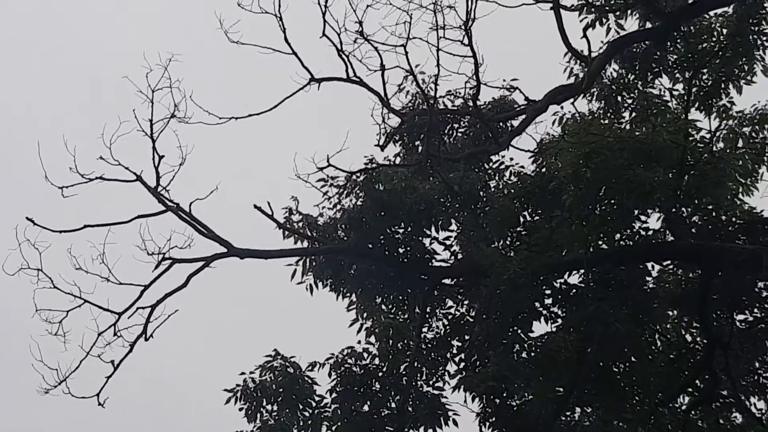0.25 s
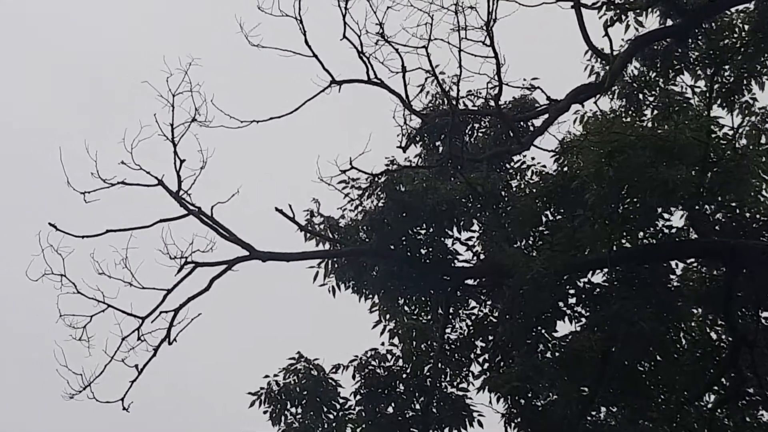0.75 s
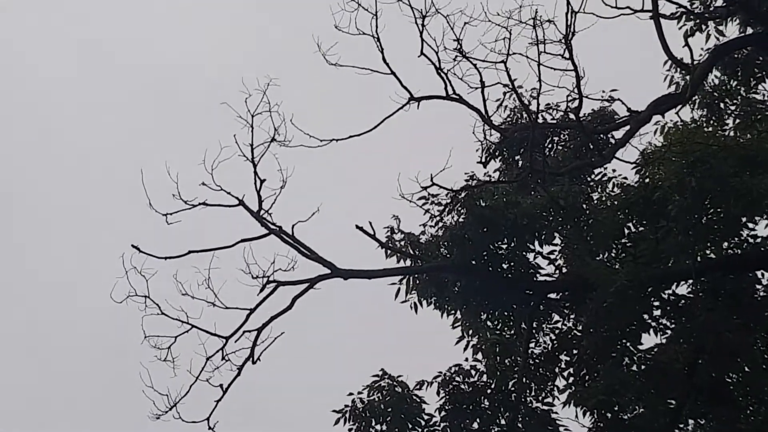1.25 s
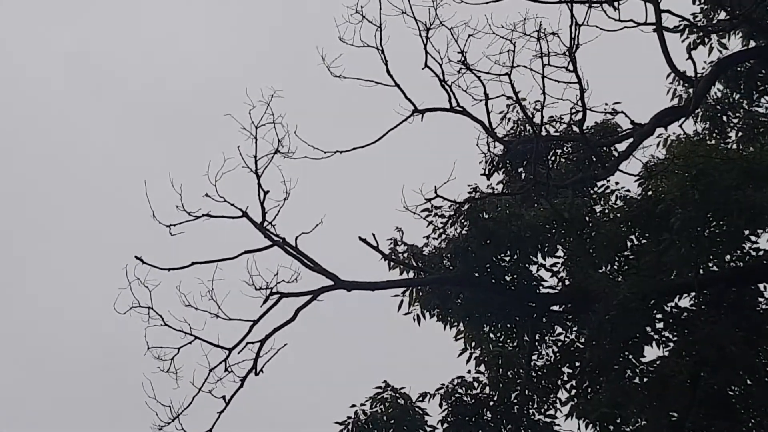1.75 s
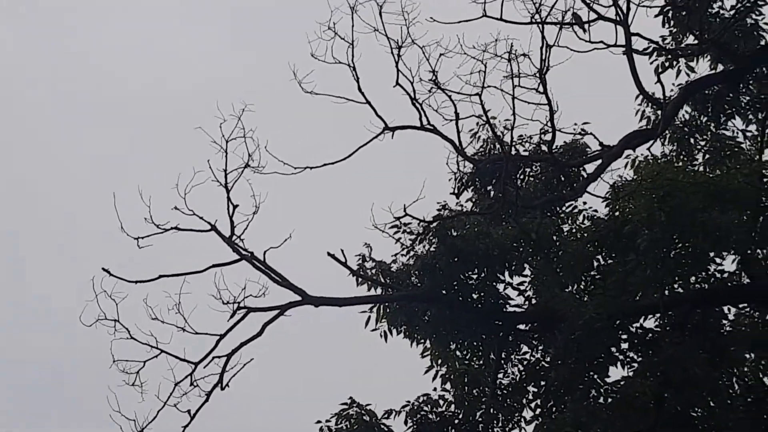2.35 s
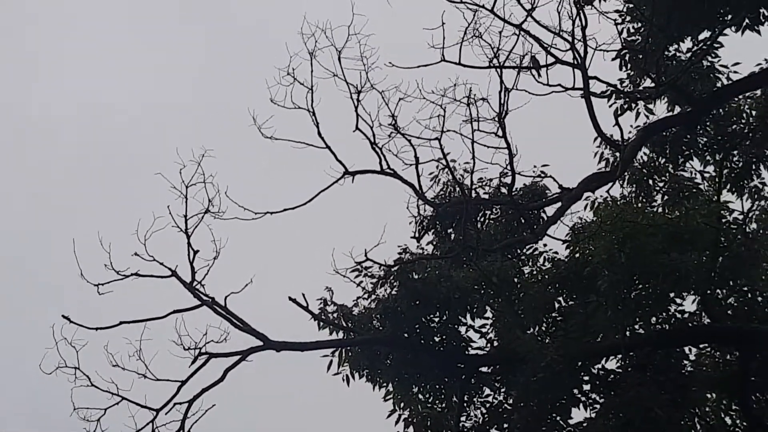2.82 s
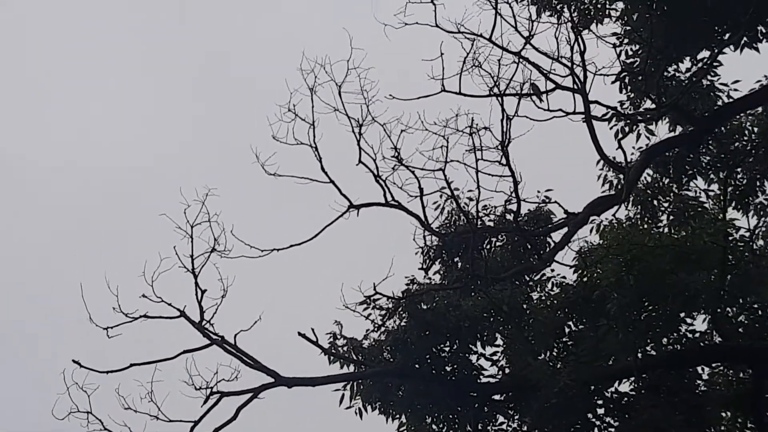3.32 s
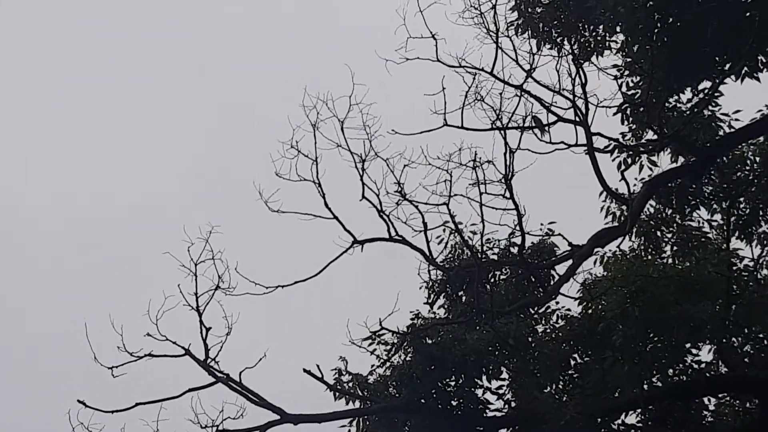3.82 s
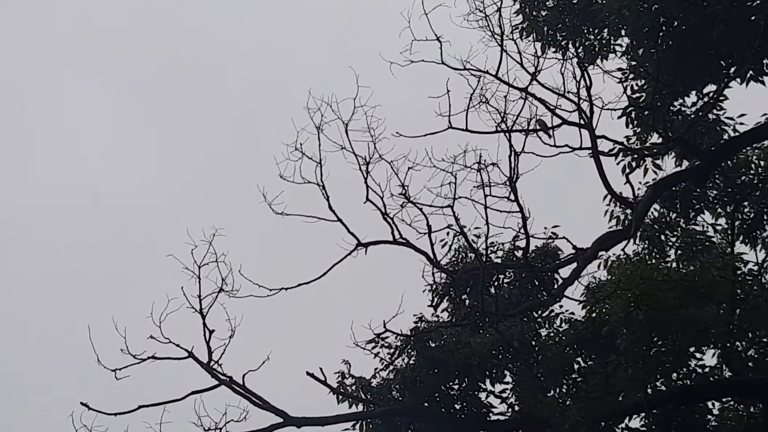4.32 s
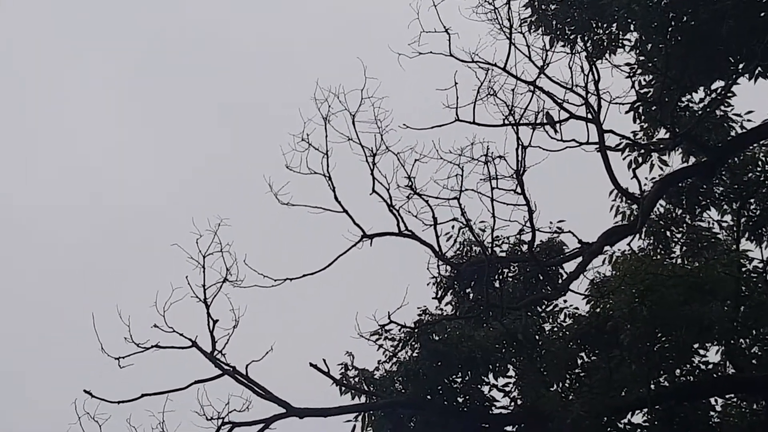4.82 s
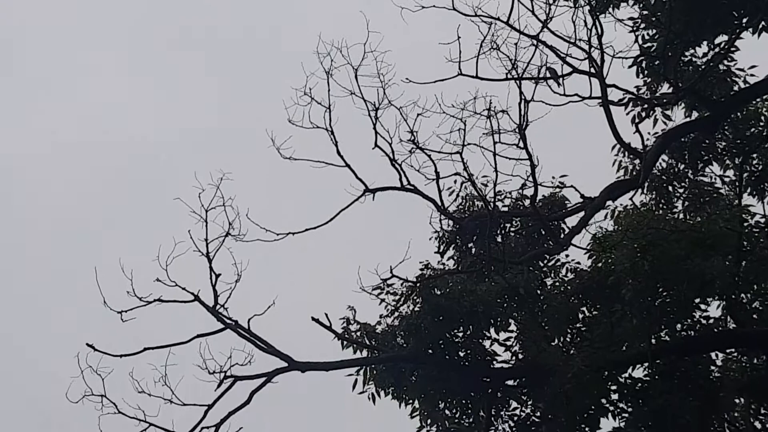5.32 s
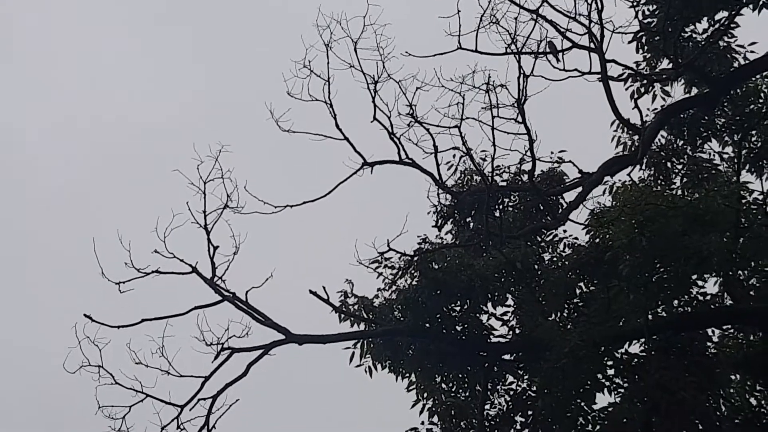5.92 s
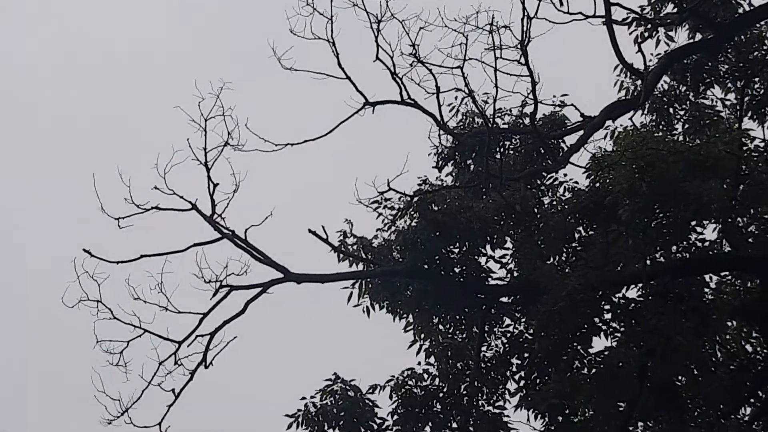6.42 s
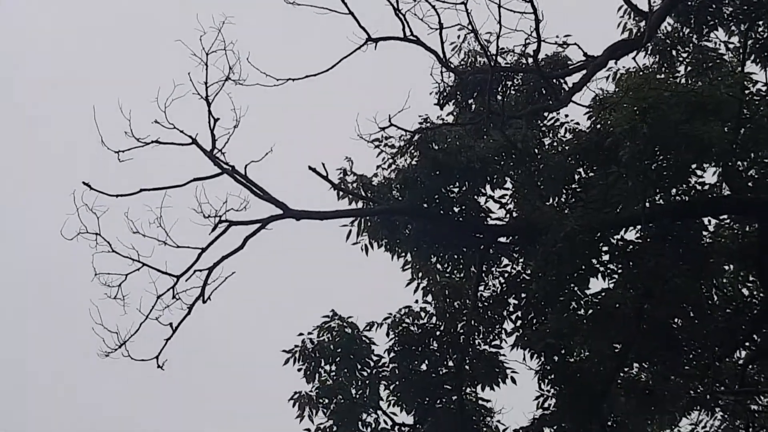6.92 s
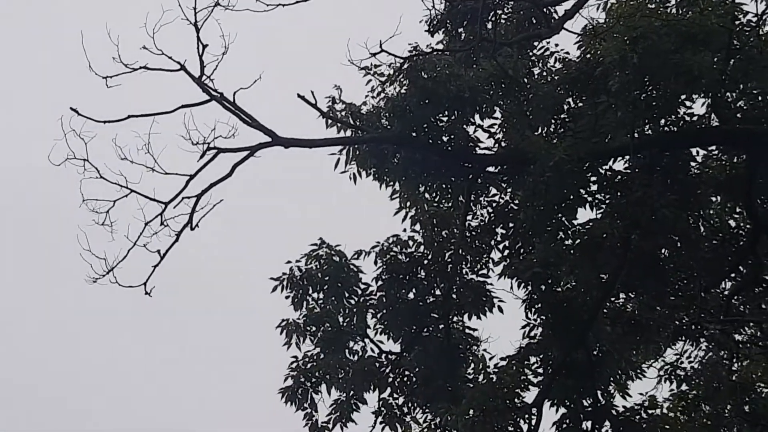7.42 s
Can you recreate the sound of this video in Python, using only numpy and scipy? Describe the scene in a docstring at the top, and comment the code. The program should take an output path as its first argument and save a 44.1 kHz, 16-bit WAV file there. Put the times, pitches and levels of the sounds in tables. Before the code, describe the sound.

Outdoors among trees, a bird close to the stereo microphones gives harsh falling squawks, quick rising yelps and short rasps throughout. Further off, frogs croak about once a second and moan softly, with low groans joining halfway. A small bird chirps and whistles to the left. A few dull bumps hit the left microphone near the start. Faint insects, a distant high chorus and low rumble lie behind.

```python
"""Under wet trees at dusk, on two spaced microphones. Close by, a bird squawks: harsh falling calls,
rising yelps and short rasps, its buzzing syrinx coloured by throat and beak. A small bird whistles.
Further off, frogs croak, moan and groan, their pulses ringing low resonances. Leaves scatter each call.
Behind them lie insects, a distant chorus, air and low rumble. A hand bumps the left microphone."""
import sys
import numpy as np
from scipy import signal
from scipy.fft import rfft, irfft
from scipy.io import wavfile
from scipy.ndimage import uniform_filter1d

SR = 44100
rng = np.random.default_rng(int(sys.argv[2]) if len(sys.argv) > 2 else 0)


def unload_audio(sound):
    """Save the sound as a 16-bit wav file, at the path given as the first command line argument."""
    columns = np.transpose(np.atleast_2d(sound))
    # keep every value between -1 and 1, then stretch to whole-number steps
    steps = np.round(np.clip(columns, -1, 1) * 32767)
    wavfile.write(sys.argv[1], SR, steps.astype(np.int16))


N = 337806
BEAK_OPEN, BEAK_NARROW, BEAK_SHUT = .98, .72, .66  # factors on the frequency of the beak resonance


def gain_of(db):
    """Decibels to amplitude."""
    return 10 ** (np.asarray(db) / 20)


def unit_rms(x):
    """Scales to an rms of one."""
    return x / np.sqrt(np.mean(x ** 2) + 1e-20)


def value_at(spectrum, hz):
    """Reads a spectrum table, joined on a log-frequency axis."""
    f, value = np.transpose(spectrum)
    return np.interp(np.log(hz + 1), np.log(f + 1), value)


def add(mix, start, sound):
    """Mixes a sound in at a start time in seconds."""
    part = mix[max(round(start * SR), 0):][:len(sound)]
    part += sound[:len(part)]


def curves(rows):
    """Times and columns of a table at every sample."""
    times, *columns = np.transpose(rows)
    t = np.arange(times[0], times[-1], 1 / SR)
    return t, *(np.interp(t, times, column) for column in columns)


def wander(like, seconds):
    """Random drift of rms one, as long as the given signal."""
    return unit_rms(uniform_filter1d(rng.standard_normal(len(like)), max(round(seconds * SR), 1)))


def swell(length, first_hz, last_hz, bend):
    """A pitch glide that settles, and a soft rise and fall in level."""
    u = np.linspace(0, 1, round(length * SR))
    return last_hz + (first_hz - last_hz) * (1 - u) ** bend, np.sin(np.pi * u ** .76) ** 1.98


def voice(hz, rough, top_hz, jitter, spread, shimmer_db, lowest=1):
    """Vibrating folds: partials fading towards top_hz, and a bright puff of noise each cycle."""
    cycles = np.cumsum(hz * (1 + jitter * wander(hz, .0071))) / SR
    orders = np.arange(lowest, int(1.3 * top_hz / hz.max()))[:, None]
    # each partial swells and fades on its own
    knots = gain_of(shimmer_db * rng.standard_normal((len(orders), len(hz) // 700 + 2)))
    shimmer = [np.interp(np.linspace(0, len(k) - 1, len(hz)), np.arange(len(k)), k) for k in knots]
    amplitudes = np.array(shimmer) / (1 + (orders * hz.mean() / top_hz) ** 6)
    folds = (amplitudes * np.cos(2 * np.pi * orders * cycles + spread * orders ** 2)).sum(0)
    puffs = (.4 + np.exp(-(cycles % 1) / .31)) * np.gradient(rng.standard_normal(len(hz)))
    noisy = np.clip(rough, 0, 1) ** 2
    return (1 - noisy) * unit_rms(folds) + noisy * unit_rms(puffs)


def shaped(x, spectrum, stretch, size=256):
    """Filters by a spectrum whose frequencies are multiplied by stretch; the result has rms one."""
    hz, t, z = signal.stft(x, SR, nperseg=size, noverlap=size - size // 4)
    stretch = np.interp(t * SR, np.arange(len(x)), np.clip(stretch * np.ones(len(x)), .5, 2))
    z = z * gain_of(value_at(spectrum, hz[:, None] / stretch))
    return unit_rms(signal.istft(z, SR, nperseg=size, noverlap=size - size // 4)[1][:len(x)])


def hiss(gain, patchy_db, likeness=np.zeros_like):
    """Stereo noise in drifting patches; gain and left-right likeness are functions of frequency."""
    frames, hz = N // 256 + 5, np.fft.rfftfreq(1024, 1 / SR)[:, None]
    a, b, c, d, patches = rng.standard_normal((frames, 513, 5)).T
    patches = unit_rms(uniform_filter1d(uniform_filter1d(patches, 10, 0), 14, 1))
    alike = np.clip(likeness(hz), -1, 1)
    left = a + 1j * b
    right = alike * left + np.sqrt(1 - alike ** 2) * (c + 1j * d)
    z = np.array([left, right]) * gain(hz) * gain_of(patchy_db * patches)
    return unit_rms(signal.istft(z, nperseg=1024, noverlap=768)[1][:, :N])


def under_trees(x, left_late_ms, left_over_right_db, echo_db):
    """The direct sound reaches one microphone first; leaves scatter a separate tail to each."""
    # echo off the foliage: (frequency [Hz], time to fall 60 dB [s])
    leaves = [(400, 0.2), (1500, 0.35), (4000, 0.2), (10000, 0.046)]
    taps = np.zeros((2, SR // 2))
    arrivals = np.arange(100, SR // 2 - 20, 20) + rng.integers(0, 20, (2, (SR // 2 - 101) // 20))
    np.put_along_axis(taps, arrivals, rng.choice([-1., 1.], arrivals.shape), 1)
    hz, t, z = signal.stft(taps, SR, nperseg=256)
    tail = signal.istft(z * gain_of(-60 * t / value_at(leaves, hz)[:, None]), SR, nperseg=256)[1]
    response = tail * gain_of(echo_db) / np.linalg.norm(tail[0])
    direct = np.sinc(np.arange(128) - 64 - np.array([[left_late_ms * SR / 1000], [0]]))
    response[:, :128] += direct
    balance = gain_of([[left_over_right_db / 2], [-left_over_right_db / 2]])
    return balance * signal.fftconvolve(x[None], response, axes=1)[:, 64:N + 64]


def air():
    """A faint, wide hiss, alike at both microphones only in the lows."""
    # still air: (frequency [Hz], relative level [dB])
    spectrum = [(65, -28), (110, -4.5), (181, -11.5), (406, -10.5), (804, -18), (1560, -19), (2570, -20.5),
                (4220, -25), (5410, -15), (6380, -16), (9270, -23), (12400, -22), (15600, -23)]
    # across the pair: (frequency [Hz], left-right likeness [0-1])
    likeness = [(60, 1), (150, 0.55), (400, 0.68), (800, 0), (3000, 0)]
    return hiss(lambda hz: gain_of(value_at(spectrum, hz)), 2.2, lambda hz: value_at(likeness, hz))


def rumble():
    """Low noise, mostly alike at both microphones."""
    # the rumble's colour: (frequency [Hz], relative level [dB])
    spectrum = [(20, -60), (40, -4), (70, 4), (95, -5), (130, -6.5), (200, -30), (400, -68)]
    shared, left, right = rng.standard_normal((N, 3)).T
    z = rfft(np.array([shared + .33 * left, shared + .57 * right]))
    return unit_rms(irfft(z * gain_of(value_at(spectrum, np.fft.rfftfreq(N, 1 / SR))), N))


def far_chorus():
    """Distant voices blurred into one high band."""
    return hiss(lambda hz: np.exp(-((hz - 4350) / 1050) ** 4), patchy_db=2)


def insects():
    """A narrow, shrill band that drifts in pitch, a little to the right."""
    # centre of the band: (time [s], pitch [Hz])
    drift = [(0, 6500), (.45, 6400), (.7, 6330), (1.1, 6140), (1.6, 6220), (4.9, 6400), (5.1, 6520),
             (7.66, 6300)]
    pitch = np.interp(np.arange(N // 256 + 5) * 256 / SR, *np.transpose(drift))
    return gain_of([[-1.5], [1.5]]) * hiss(lambda hz: np.exp(-((hz - pitch) / 300) ** 2), patchy_db=1.5)


def backdrop():
    """The far layers swell and sink over steady air."""
    # (time [s], chorus level [dB], insect level [dB], rumble level [dB])
    swells = [(0.0, -78, -73, -59), (0.49, -63.5, -73, -67), (0.79, -73, -67.5, -70),
              (1.32, -67, -73.5, -63), (3.26, -66, -74, -65.5), (3.62, -61, -65, -69),
              (3.9, -67.5, -73, -61), (4.52, -62.5, -69, -74.5), (4.65, -61.5, -67.5, -65),
              (5.29, -75.5, -73, -66.5), (5.55, -60.5, -75.5, -63.5), (6.25, -66.5, -65, -63.5),
              (6.57, -64, -78, -69.5), (6.93, -66, -64, -62.5), (7.27, -65, -80, -69.5),
              (7.66, -82, -63.5, -65.5)]
    times, *levels = np.transpose(swells)
    chorus_db, insects_db, rumble_db = (np.interp(np.arange(N) / SR, times, db) for db in levels)
    return (gain_of(-64) * air() + gain_of(chorus_db) * far_chorus()
            + gain_of(insects_db) * insects() + gain_of(rumble_db) * rumble())


def groaning_frog(knocks_per_s=70):
    """Some way off, in the centre: slow knocks ring a low, sagging resonance."""
    # (start [s], length [s], first ring [Hz], last ring [Hz], level [dB])
    groans = [(3.52, 0.26, 480, 439.4, -67), (4.769, 0.43, 536, 448.5, -63.5),
              (5.54, 0.21, 567, 494.5, -64.5), (5.88, 0.44, 516, 464, -65), (6.891, 0.295, 417, 388, -66.5),
              (7.0, 0.49, 557, 440.5, -61)]
    out = np.zeros(N)
    for start, length, first_hz, last_hz, db in groans:
        hz = np.linspace(first_hz, last_hz, round(length * SR))
        beat = np.cumsum(knocks_per_s * (1 + .07 * wander(hz, .03))) / SR % 1
        ring = np.sin(2 * np.pi * np.cumsum(hz * (1 + .08 * wander(hz, .006))) / SR)
        call = unit_rms(ring * (.25 + np.sin(np.pi * beat) * np.exp(-beat / .6)))
        add(out, start, gain_of(db + .47 * wander(hz, .012)) * call * signal.windows.tukey(len(hz), .4))
    return under_trees(out, left_late_ms=.03, left_over_right_db=-.1, echo_db=-3.5)


def moaning_frog(moans):
    """A soft rising call: a fluttering low tone on the second partial and a buzz above."""
    # low resonance, before its stretch: (frequency [Hz], gain [dB])
    low_resonance = [(470, 0), (620, -22), (690, -12), (950, -32), (1300, -50)]
    # upper resonances, before their stretch: (frequency [Hz], gain [dB])
    buzz_resonance = [(900, -40), (1300, -16), (1580, -9), (1700, -13), (1860, 0), (2050, -18), (2600, -40)]
    out = np.zeros(N)
    for start, length, first_hz, last_hz, low_db, buzz_db in moans:
        hz, envelope = swell(length, first_hz, last_hz, bend=1.341)
        drive = voice(hz, rough=.42, top_hz=2800, jitter=.005, spread=0, shimmer_db=1.5, lowest=2)
        flutter = gain_of(5 * wander(hz, .014) - 3)
        low = gain_of(low_db) * flutter * shaped(drive, low_resonance, stretch=.68, size=1024)
        buzz = gain_of(buzz_db) * shaped(drive, buzz_resonance, stretch=.99, size=1024)
        add(out, start, np.sqrt(envelope) * (low + buzz))
    return out


def moaning_pair():
    """Two frogs some way off, one on the left and a lower one on the right."""
    # (start [s], length [s], first pitch [Hz], last pitch [Hz], low tone before flutter [dB], buzz [dB])
    left_moans = [(0, 0.3, 216.9, 236.7, -66, -64.5), (.27, 0.29, 215, 245.7, -66.5, -76),
                  (1.5, 0.22, 219.5, 230, -71, -63.5), (1.7, 0.201, 231.6, 239.7, -70, -66.5),
                  (2.18, 0.15, 214.2, 234.4, -71.5, -68), (2.52, 0.26, 218.9, 236, -69.5, -60),
                  (3.5, .22, 214.5, 236.2, -69.5, -59.5), (4.05, 0.26, 233, 240.3, -84, -78.5),
                  (5.34, 0.23, 219.9, 229.5, -68, -61), (5.57, 0.23, 231.2, 243, -77, -65),
                  (6.41, 0.36, 219, 239.8, -71.5, -86), (6.93, 0.18, 233, 237.6, -87, -65.5)]
    # the same columns for the right frog
    right_moans = [(.64, 0.35, 206.5, 217, -71.5, -89), (1.6, 0.27, 203.2, 216.7, -65.5, -66.5),
                   (2.56, 0.23, 207.5, 219.6, -66, -70), (3.68, 0.2, 206.3, 219.4, -65, -73),
                   (3.9, 0.26, 211.7, 214.5, -70, -99), (4.35, 0.36, 206.3, 215.2, -62, -71),
                   (4.93, 0.39, 212, 218.3, -66.5, -81), (5.55, 0.235, 205.1, 222.6, -59.5, -65),
                   (5.9, 0.24, 219, 222, -62, -86), (6.55, 0.25, 208, 208.4, -62.5, -84),
                   (6.9, 0.14, 203.8, 214.2, -68.5, -64)]
    left = under_trees(moaning_frog(left_moans), left_late_ms=-.42, left_over_right_db=.5, echo_db=-.78)
    right = under_trees(moaning_frog(right_moans), left_late_ms=.16, left_over_right_db=.8, echo_db=-.78)
    return left + right


def croaking_frog():
    """Some way off, uneven pulses ring a vocal sac."""
    # (start [s], length [s], first pulse rate [Hz], last pulse rate [Hz], level [dB])
    croaks = [(.08, 0.25, 157.5, 152.3, -53.5), (.71, 0.23, 163.3, 149.2, -54.5),
              (1.539, 0.23, 156.6, 153.6, -56), (3.0, 0.25, 167.2, 151.3, -56.5),
              (3.599, 0.27, 150.7, 158.4, -53.5), (4.381, 0.29, 174.3, 152.5, -55),
              (5.001, 0.21, 166.5, 148.3, -56.5), (5.921, 0.25, 176, 153.4, -56),
              (6.759, 0.25, 163.7, 150.3, -55), (7.43, 0.22, 165.3, 151.7, -53)]
    # resonance of the sac: (frequency [Hz], gain [dB])
    sac = [(500, -29.5), (900, -23.5), (1300, -13), (1550, -3.5), (1800, -13), (2100, -14.5), (2600, -35)]
    out = np.zeros(N)
    for start, length, first_hz, last_hz, db in croaks:
        hz, envelope = swell(length, first_hz, last_hz, bend=2.554)
        pulses = voice(hz, rough=.78, top_hz=2800, jitter=.02, spread=0, shimmer_db=1.5, lowest=3)
        add(out, start, gain_of(db) * envelope * shaped(pulses, sac, stretch=1, size=512))
    return under_trees(out, left_late_ms=-.45, left_over_right_db=-1, echo_db=-4.5)


def whistle(hz):
    """A near-pure tone with a trembling pitch and level."""
    trembling_hz = hz * (1 + .028 * wander(hz, .002))
    return gain_of(6 * wander(hz, .004)) * np.sin(2 * np.pi * np.cumsum(trembling_hz) / SR)


def small_bird():
    """To the left, a short whistled song comes three times among faint gliding chirps."""
    # one song: (time from its start [s], pitch [Hz], relative level [dB])
    song = [(0, 4700, -12), (.007, 5600, -8), (.014, 5750, -8), (.021, 4750, -1), (.027, 4400, -19),
            (.036, 4450, -6), (.056, 3350, -7), (.066, 3450, -7), (.077, 4300, -4), (.088, 4800, -25)]
    # each time it is sung: (start [s], level [dB])
    entries = [(1.69, -51), (3.838, -50), (6.412, -47)]
    # (start [s], length [s], first pitch [Hz], last pitch [Hz], level [dB])
    chirps = [(0.169, 0.03, 4430, 4200, -62.5), (0.6, 0.04, 4320, 3820, -61),
              (1.083, .016, 4800, 5200, -57), (1.097, 0.032, 5000, 4220, -62.5),
              (2.397, 0.017, 3900, 5300, -70), (2.42, 0.016, 5300, 3640, -63),
              (4.062, 0.096, 4540, 3030, -65), (5.073, .016, 4100, 4360, -63),
              (5.089, 0.029, 4000, 3410, -65), (5.202, 0.016, 4600, 5500, -64.5),
              (5.21, 0.05, 5100, 3800, -63.5), (5.285, 0.021, 3600, 3710, -59.5),
              (5.32, .018, 3900, 4460, -75), (6.038, .03, 5600, 4560, -63), (6.145, 0.04, 5500, 2770, -59),
              (6.713, 0.029, 5200, 3310, -54.5)]
    out = np.zeros(N)
    _, hz, contour_db = curves(song)
    for start, db in entries:
        add(out, start, gain_of(contour_db + db) * whistle(hz))
    for start, length, first_hz, last_hz, db in chirps:
        glide = np.geomspace(first_hz, last_hz, round(length * SR))
        add(out, start, gain_of(db) * whistle(glide) * signal.windows.tukey(len(glide), .6))
    return under_trees(out, left_late_ms=-.36, left_over_right_db=1.5, echo_db=-2.5)


def microphone_bumps(t60_s=.059, attack_s=.00071):
    """A hand knocks the left capsule's mount, which swings a few cycles; little reaches the right."""
    # (time [s], level before each side's gain [dB], ring [Hz])
    bumps = [(0.045, -37, 166), (0.385, -47.5, 179), (0.408, -51.5, 218), (0.414, -44.5, 306),
             (1.266, -49.5, 327)]
    out, t = np.zeros(N), np.arange(2000) / SR
    for start, db, hz in bumps:
        envelope = gain_of(db - 60 * t / t60_s) * (1 - np.exp(-t / attack_s))
        add(out, start, envelope * np.sin(2 * np.pi * hz * t))
    return out * gain_of([[8], [-12]])


def frayed(effort_db):
    """Roughness: the voice frays as effort drops under the call's peak."""
    return np.minimum(.62 + .022 * (effort_db.max() - effort_db), 1)


def bird_calls(onset_db=-10.5, scoop_hz=25.05, chest_db=-21, beak_wide=1.15):
    """Yields each call as (time [s], effort [dB], pitch [Hz], roughness, beak factor, chest [dB])."""
    # falling calls: (start [s], rise [s], hold [s], effort at the hold's start and end [dB],
    # pitch at the hold's start, middle and end and after the fade [Hz])
    squawks = [ (.3, 0.024, 0.096, -41.5, -44.5, 417, 403.3, 386.3, 341),
               (1.229, 0.026, 0.083, -43, -42, 418, 405, 396.3, 347),
               (2.151, .018, 0.061, -44, -46.5, 388.3, 363, 352, 325),
               (2.805, .027, 0.051, -42, -48.5, 402, 383, 366.5, 318),
               (3.482, 0.025, 0.1, -41.5, -48, 403, 382, 360.4, 326),
               (3.835, 0.019, 0.049, -49.5, -56.5, 408, 397, 377, 350),
               (3.931, 0.023, 0.0095, -47.5, -54.5, 368, 363.6, 360, 331),
               (4.45, 0.036, 0.087, -42.5, -43.5, 422.6, 410.6, 395, 349),
               (4.775, 0.022, 0.076, -45.5, -47, 485, 424, 413.6, 317),
               (5.401, 0.038, 0.089, -41, -43.5, 427.6, 417.3, 395, 345),
               (5.61, 0.023, 0.1, -48.5, -48, 434, 408, 382, 326),
               (5.906, 0.041, 0.054, -53.5, -63, 414, 395.5, 385, 353),
               (6.234, 0.029, 0.094, -41.5, -44.5, 416.4, 401, 391.6, 347),
               (6.782, .027, .14, -41, -50, 412, 363, 321.4, 283),
               (7.001, 0.021, 0.015, -49, -55, 398, 403, 385, 360),
               (7.475, 0.039, .056, -41.5, -47.5, 409, 385, 363, 337)]
    # rising calls: (start [s], climb [s], early effort [dB], early pitch [Hz],
    # top effort [dB], top pitch [Hz])
    yelps = [(.215, 0.075, -50.5, 402, -49, 463), (1.33, 0.069, -49.5, 400, -47, 472),
             (2.08, 0.059, -53, 390, -46, 485.5), (2.215, 0.046, -52, 387, -44, 472),
             (2.44, .062, -49, 410.6, -43, 478), (2.645, 0.051, -49, 409.5, -42, 479.5)]
    # short, noisy calls: (time of the middle [s], effort there [dB])
    rasps = [(1.539, -59), (1.644, -53), (3.425, -57), (3.764, -55), (4.212, -56.5), (4.385, -62),
             (6.051, -65), (6.631, -58), (6.746, -61.5), (7.174, -53), (7.273, -54.5), (7.338, -54.5)]
    for start, rise, hold, first_db, last_db, *hz in squawks:
        times = start + np.cumsum([0, rise, hold / 2, hold / 2, .052])
        db = np.array([first_db + onset_db, first_db, (first_db + last_db) / 2, last_db, last_db - 21])
        pitch = [hz[0] - scoop_hz, *hz]
        beak = [BEAK_OPEN, BEAK_OPEN, (BEAK_OPEN + BEAK_NARROW) / 2, BEAK_NARROW, BEAK_SHUT]
        yield np.transpose([times, db, pitch, frayed(db), beak, [chest_db] * 5])
    for start, climb, first_db, first_hz, top_db, top_hz in yelps:
        times = start + np.array([0, .014, climb, climb + .028])
        db = np.array([first_db + onset_db, first_db, top_db, top_db - 20])  # breaks off at the top
        pitch = [first_hz - scoop_hz, first_hz, top_hz, top_hz - 110]
        beak = [beak_wide, beak_wide, BEAK_NARROW, BEAK_SHUT]
        yield np.transpose([times, db, pitch, frayed(db), beak, [chest_db + 11] * 4])
    rasp_hz, rasp_rough, rasp_beak = 400, .97, .86
    for middle, db in rasps:
        yield [(middle - .017, db + onset_db, rasp_hz, rasp_rough, beak_wide, chest_db),
               (middle, db, rasp_hz, rasp_rough, rasp_beak, chest_db),
               (middle + .022, db + 2.5, rasp_hz, rasp_rough, rasp_beak, chest_db)]


def squawking_bird(base_hz=422.5):
    """Close by, a syrinx buzzes; the throat follows the pitch, and the beak's ring falls as it shuts."""
    # throat resonances at the base pitch: (frequency [Hz], gain [dB])
    throat = [(600, -40), (1800, -30), (2150, -30), (2500, -17), (2900, -11), (3300, 5), (3750, -6),
              (4300, -10), (6000, -8), (8500, -50), (15500, -53)]
    # low partials at the base pitch: (frequency [Hz], gain [dB])
    chest = [(600, -30), (1000, -28), (1250, -6), (1650, 0), (1900, -12), (2200, -30), (3000, -45)]
    # resonance of the open beak, at factor one: (frequency [Hz], gain [dB])
    open_beak = [(3000, -40.5), (4000, -11), (4700, 0), (5500, -4), (7000, -11), (8800, -22.5),
                 (15500, -29.5)]
    # breath past the beak, before its stretch: (frequency [Hz], gain [dB])
    breath_colour = [(7000, -23), (9500, -12), (12000, -1), (14000, 13), (15700, -18)]
    out = np.zeros(N)
    breath = shaped(rng.standard_normal(SR // 2), breath_colour, stretch=.87)
    for points in bird_calls():
        t, effort_db, hz, rough, beak, chest_db = curves(points)
        syrinx = voice(hz, rough, top_hz=5200, jitter=.006, spread=.3, shimmer_db=3.5)
        gape = np.clip((beak - BEAK_NARROW) / (BEAK_OPEN - BEAK_NARROW), 0, 1.5) ** 2
        call = gain_of(-7 * gape) * shaped(syrinx, throat, hz / base_hz)  # weak while the beak is wide
        call += gain_of(.5) * shaped(syrinx, open_beak, beak)
        call += gain_of(chest_db) * shaped(syrinx, chest, hz / base_hz)
        call /= np.sqrt(uniform_filter1d(call ** 2, 900) + 1e-3)  # effort alone sets the loudness
        call += gain_of(-23) * breath[rng.integers(SR // 4):][:len(t)]
        unsteady_db = effort_db + wander(t, .011)
        add(out, t[0], gain_of(unsteady_db) * call * signal.windows.tukey(len(t), .1))
    return under_trees(out, left_late_ms=.27, left_over_right_db=-1.4, echo_db=-3.5)


def scene():
    """The animals, the bumps and the backdrop as they reach the two microphones."""
    near_bird = squawking_bird()
    frogs = croaking_frog() + moaning_pair() + groaning_frog()
    return near_bird + frogs + small_bird() + microphone_bumps() + backdrop()


def record(dry):
    """The recorder's band limit: a steep cut at the top of the treble."""
    lowpass = signal.firwin(511, cutoff=15720, window=("kaiser", 9), fs=SR)
    return signal.oaconvolve(dry, lowpass[None], "same", axes=1)


dry = scene()
out = record(dry)
unload_audio(out)
```